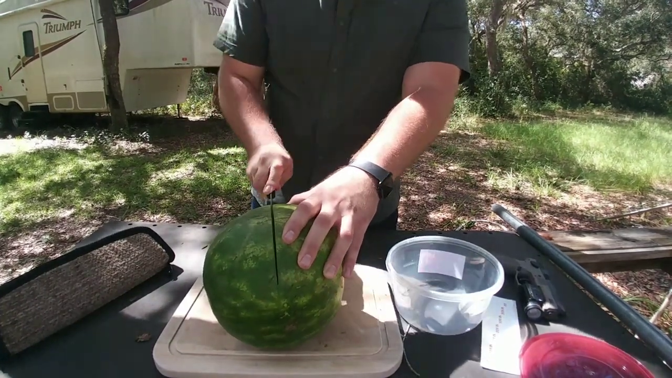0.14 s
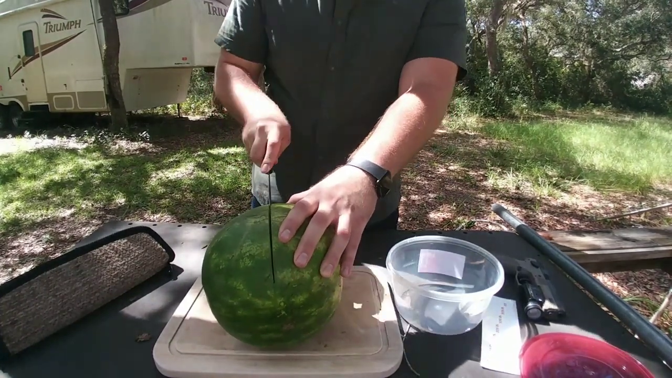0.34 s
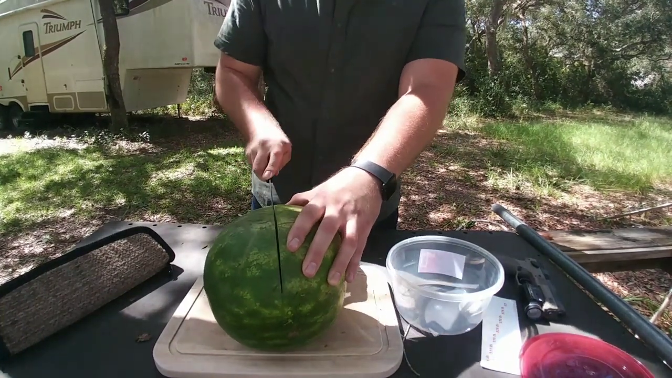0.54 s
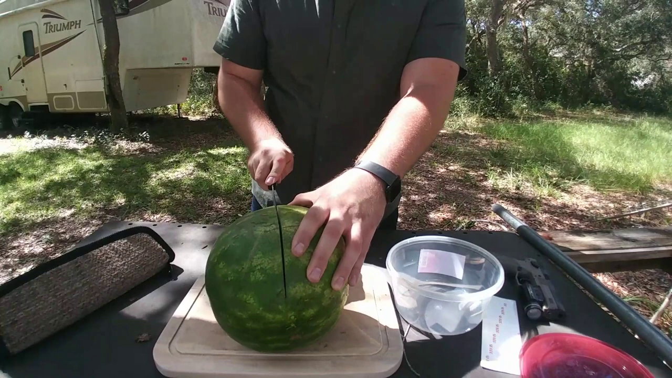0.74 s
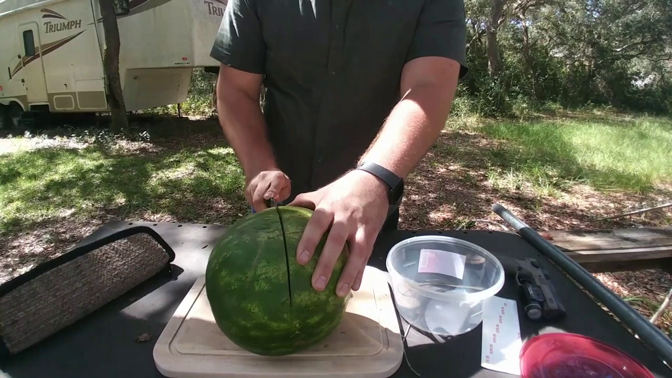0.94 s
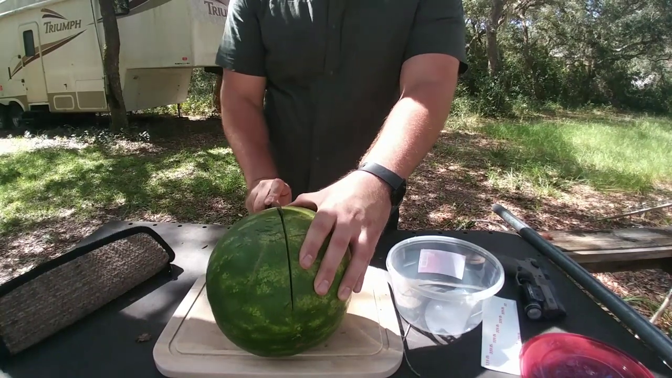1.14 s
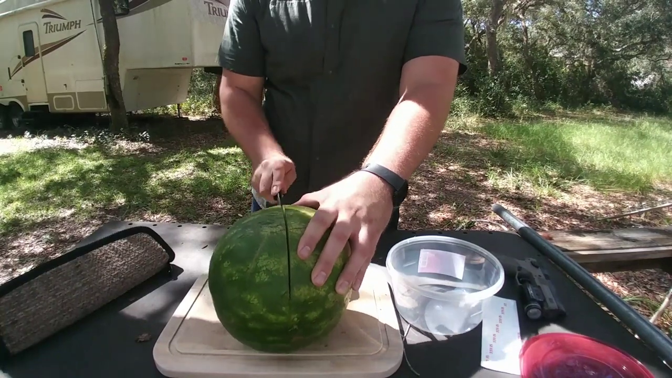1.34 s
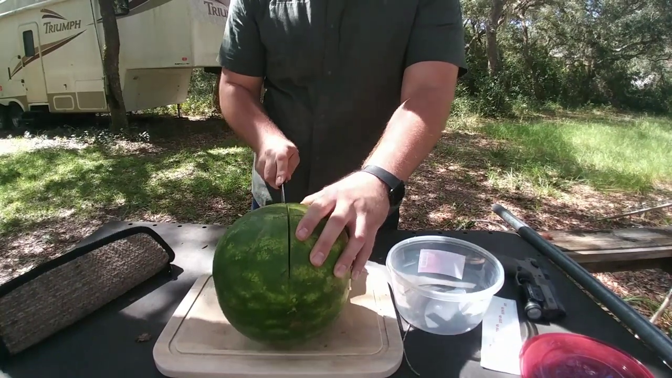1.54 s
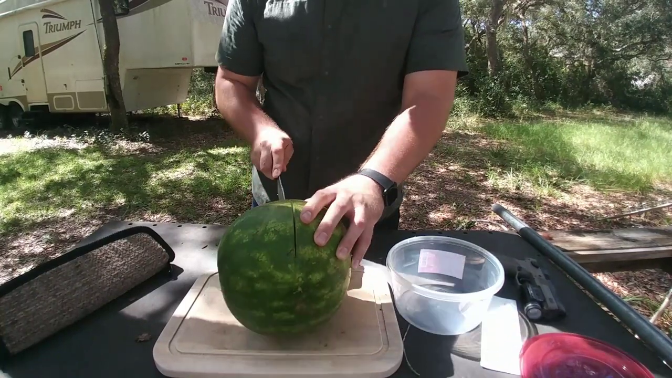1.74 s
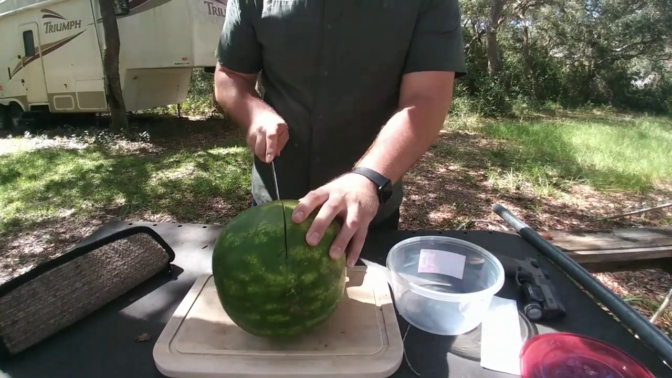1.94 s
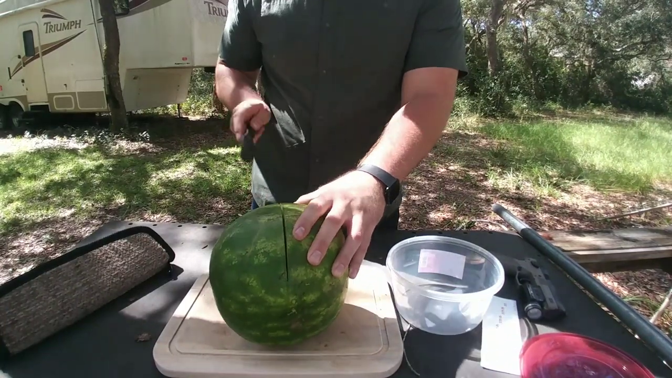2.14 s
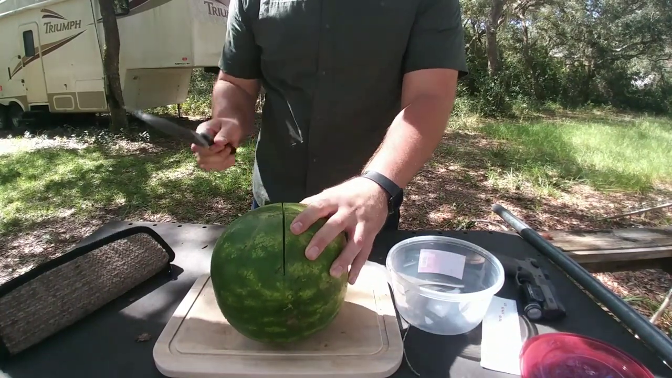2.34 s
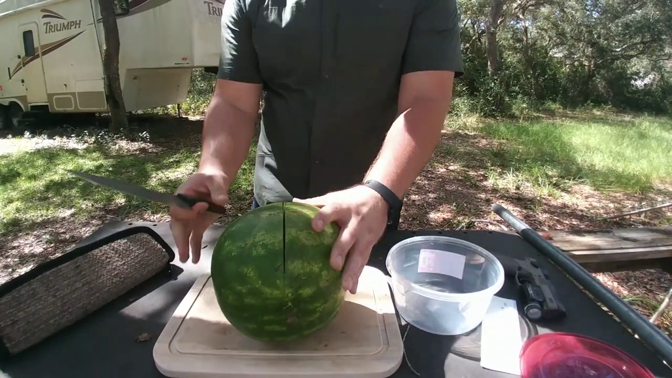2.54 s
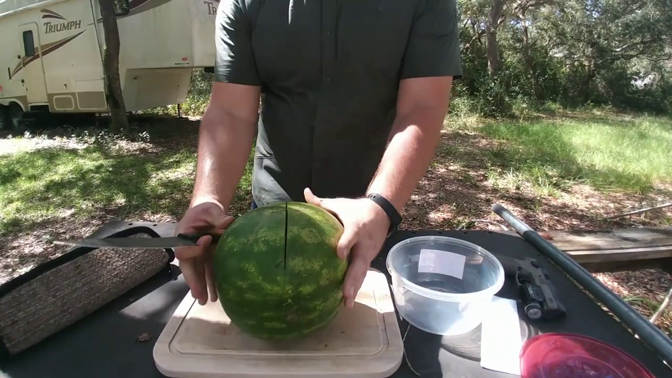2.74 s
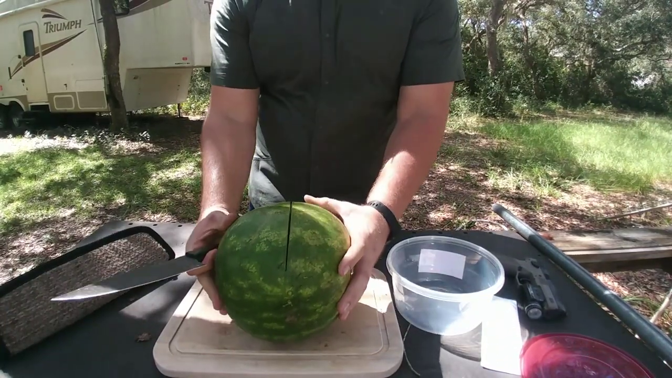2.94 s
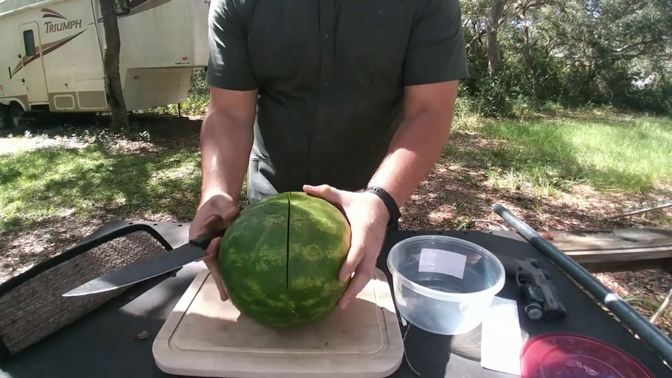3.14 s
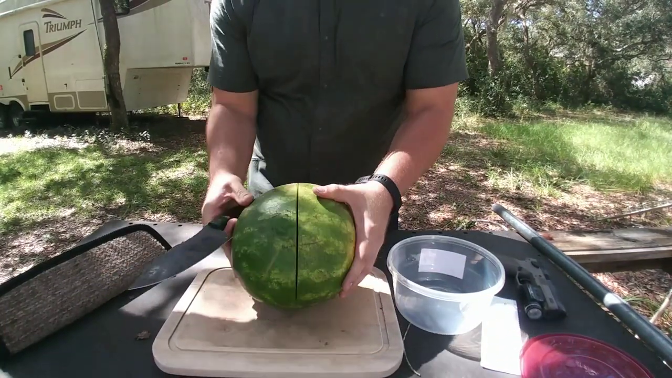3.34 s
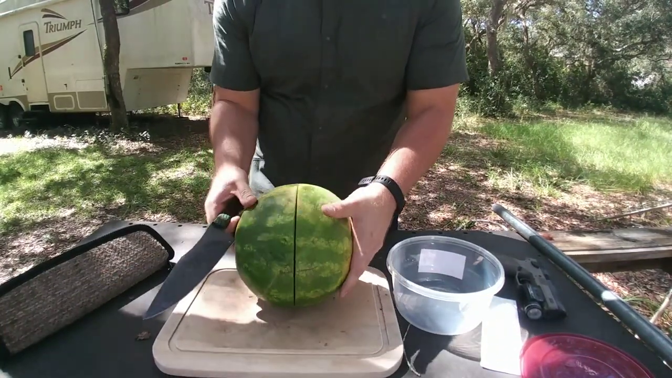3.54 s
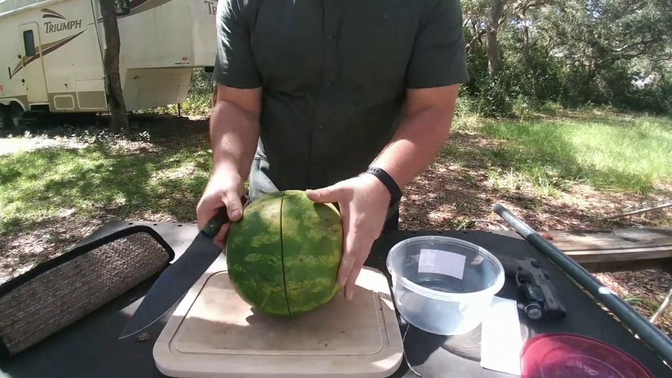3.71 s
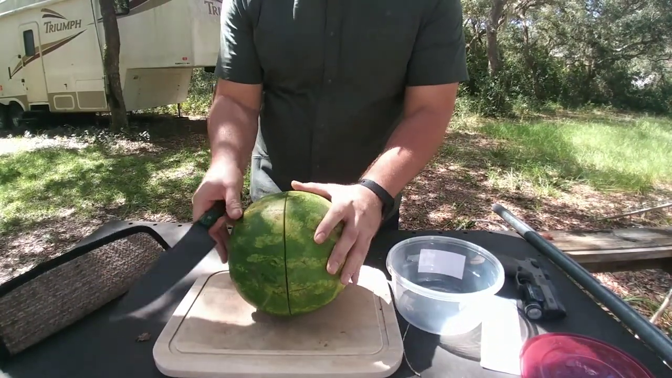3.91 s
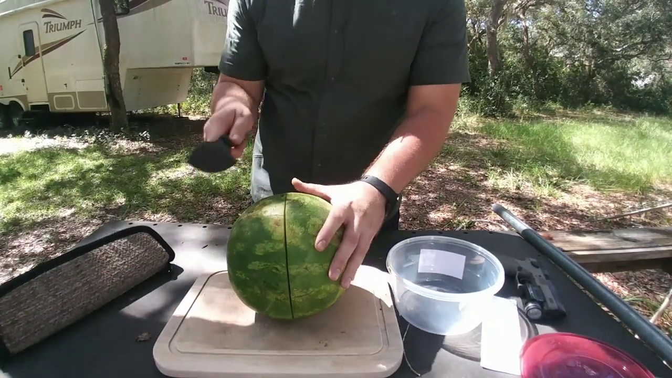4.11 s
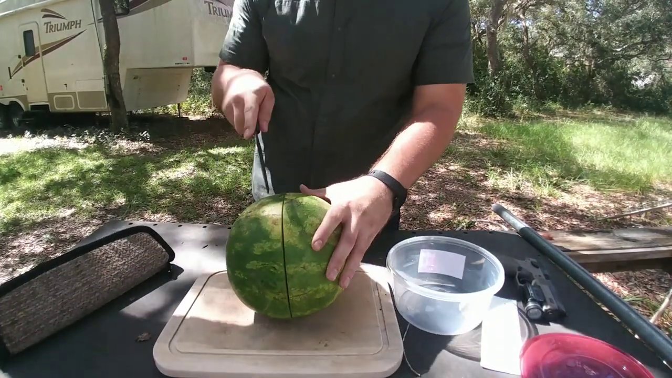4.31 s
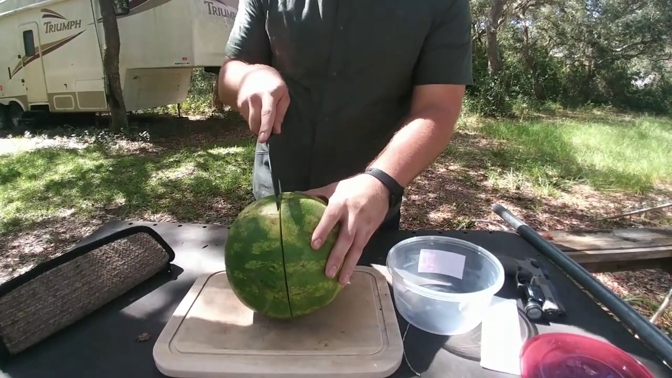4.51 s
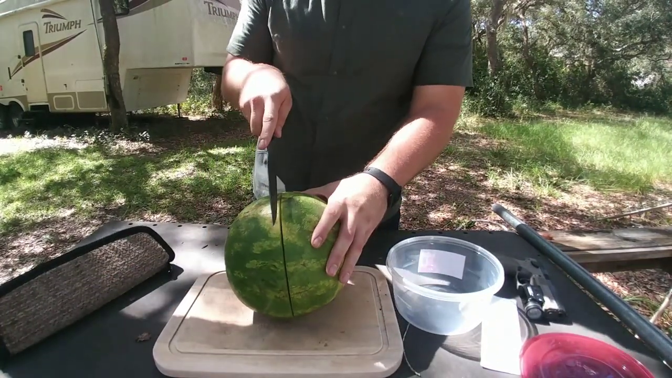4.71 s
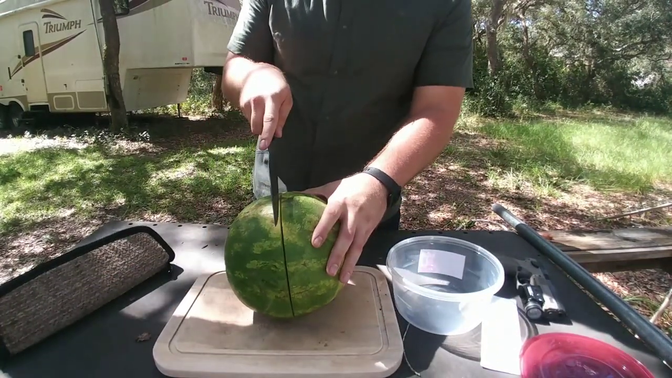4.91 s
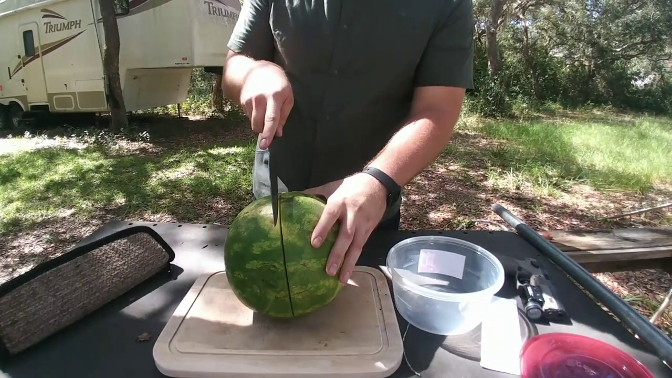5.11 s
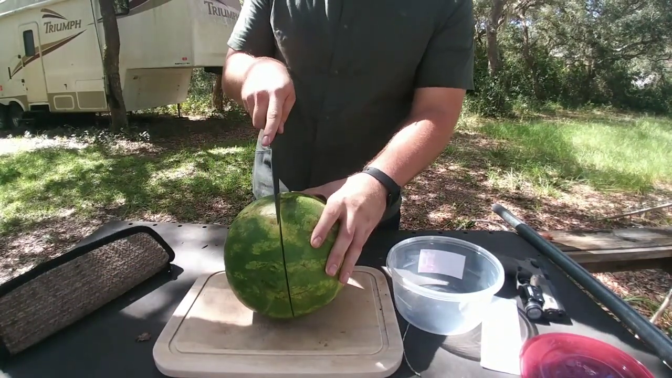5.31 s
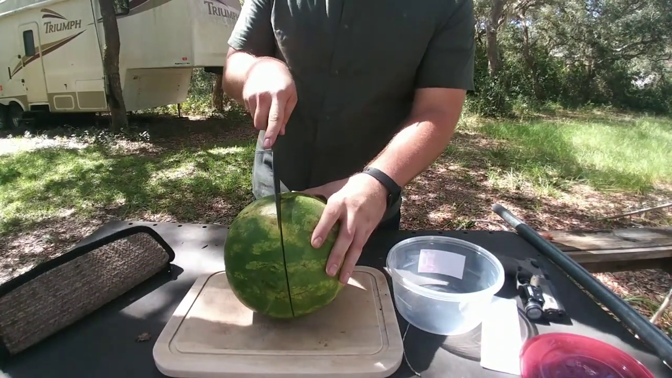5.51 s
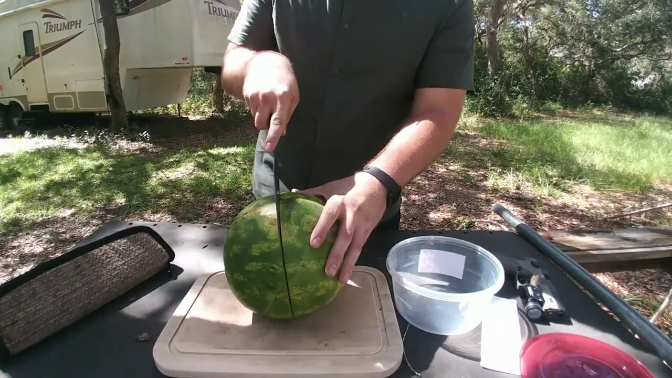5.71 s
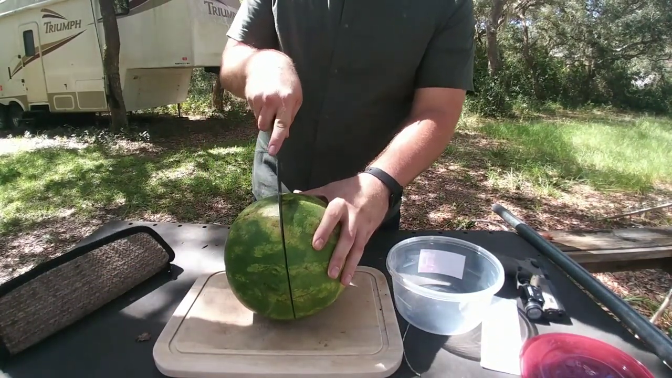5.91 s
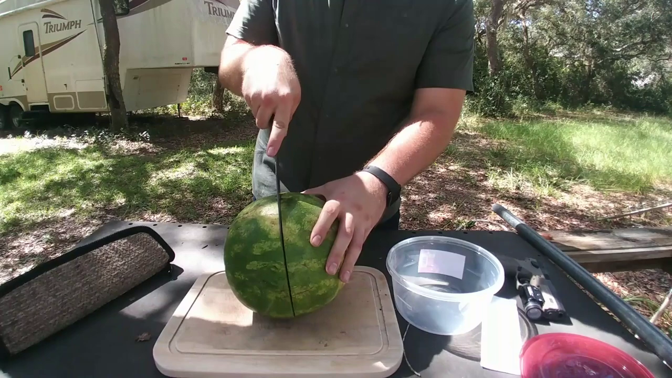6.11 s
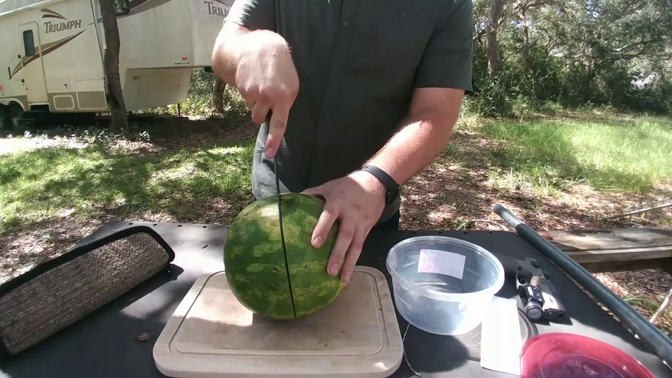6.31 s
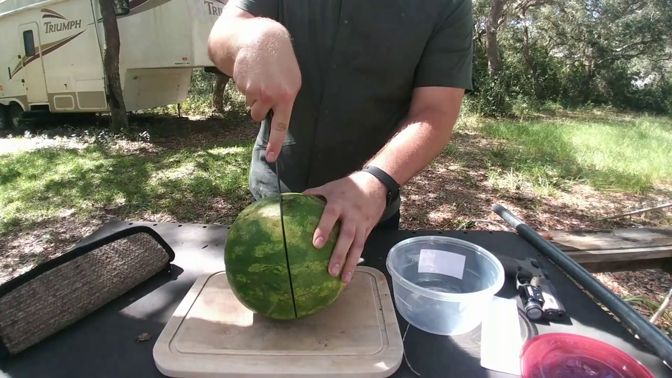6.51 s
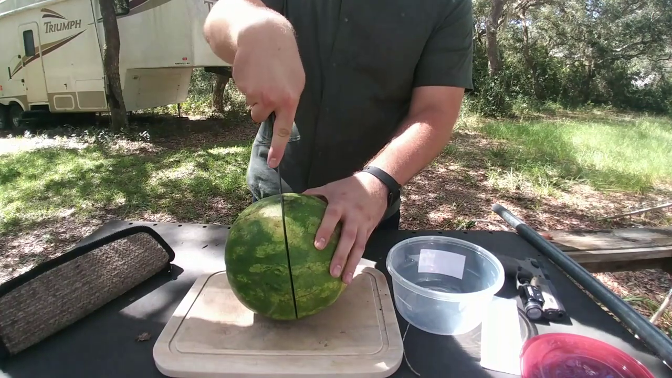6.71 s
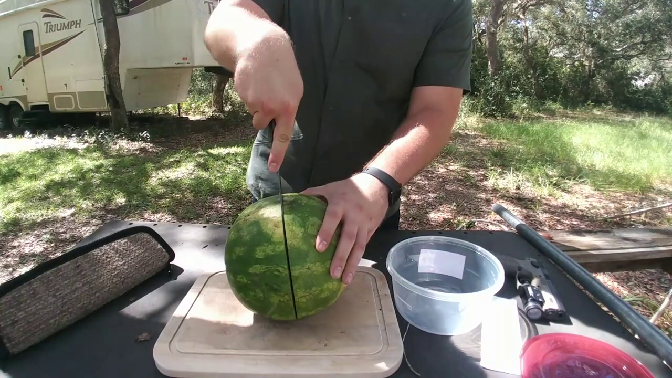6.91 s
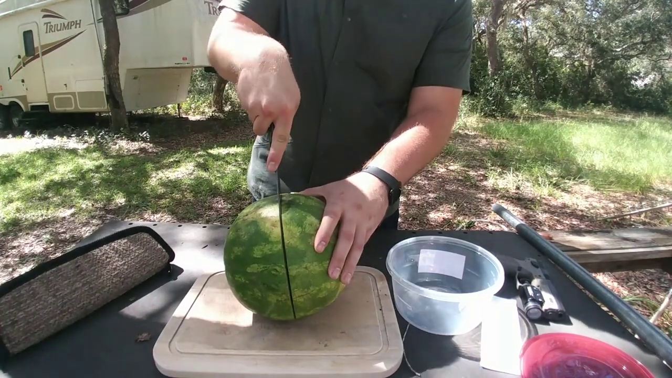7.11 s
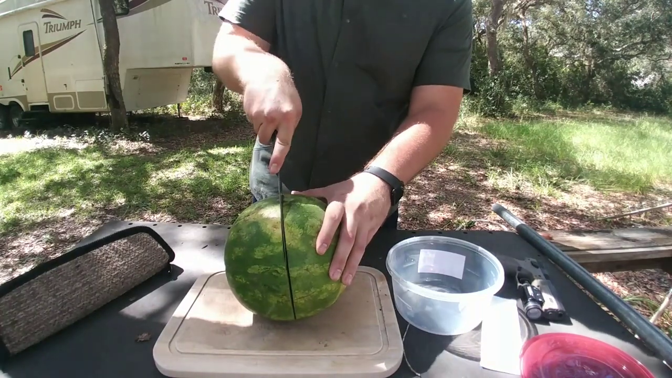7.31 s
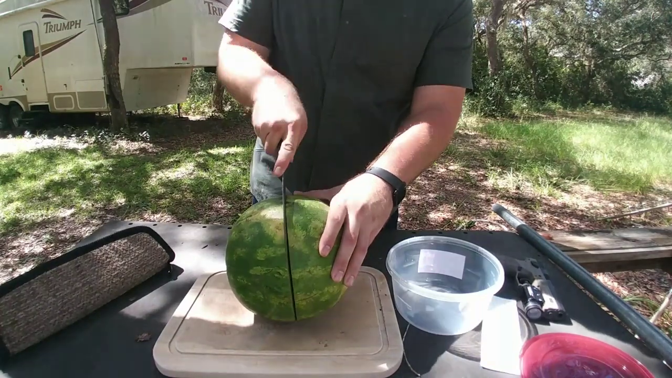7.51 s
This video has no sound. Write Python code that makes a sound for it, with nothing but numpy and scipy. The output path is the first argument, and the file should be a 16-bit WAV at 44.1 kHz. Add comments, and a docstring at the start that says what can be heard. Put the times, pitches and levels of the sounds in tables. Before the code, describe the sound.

Soft rasping, squelching knife strokes in a watermelon and a thud on a board, over faintly trilling crickets.

```python
"""A long knife saws through a watermelon: cells burst, rind rasps, wet steel hisses, air pockets squelch.
The blade rubs and rings faintly as it comes free. The melon is turned by hand, knocks and thuds onto
a cutting board, shaking the folding table below; a second cut begins.
Outdoors throughout: crickets trill by wing strokes over soft air, a low rumble, a far engine
and faint distant calls."""
import sys
import numpy as np
from scipy import signal
from scipy.fft import rfft, irfft
from scipy.io import wavfile
from scipy.ndimage import uniform_filter1d

SR = 44100
rng = np.random.default_rng(int(sys.argv[2]) if len(sys.argv) > 2 else 0)


def file_out(sig):
    """Save sig as 16-bit WAV at sys.argv[1]."""
    # one column per channel
    cols = np.atleast_2d(sig).T
    # limit, then scale
    lim = np.clip(cols, -1, 1)
    pcm = np.round(lim * 32767).astype(np.int16)
    wavfile.write(sys.argv[1], SR, pcm)


N = 332955
T = np.arange(N) / SR

# knife pushes: (start [s], end [s], melon body [dB], rind rasp [dB], wet hiss [dB])
KNIFE_STROKES = [(-.03, 0.115, -52.5, -53, -60.5), (0.116, 0.167, -51.5, -54.5, -65.5),
                 (0.293, 0.36, -67.5, -59.5, -80), (0.873, 1.02, -56.5, -65, -69.5),
                 (1.015, 1.239, -56, -60, -65.5), (1.32, 1.507, -72, -70, -72),
                 (1.642, 1.883, -76, -68.5, -70), (5.93, 5.995, -72, -67, -66),
                 (6.09, 6.118, -83, -67, -68), (6.216, 6.302, -67, -71, -69), (6.498, 6.617, -67, -72, -76),
                 (6.745, 6.821, -67.5, -68.5, -63.5), (6.976, 7.081, -60, -62.5, -57.5),
                 (7.137, 7.354, -59, -64, -65.5), (7.382, 7.514, -61.5, -67, -69),
                 (7.518, 7.56, -54.5, -63, -68)]
# wet steel and hands sliding on the rind: (start [s], end [s], level [dB])
RIND_SLIDES = [(0.142, 0.905, -65.5), (1.873, 2.122, -65), (2.065, 2.1, -69), (2.374, 2.627, -66.5),
               (2.634, 3.006, -65), (3.122, 3.276, -58.5), (3.274, 3.413, -64.5), (3.405, 3.474, -56.5),
               (3.652, 3.82, -51), (3.78, 3.991, -59.5), (4.025, 4.102, -70), (4.26, 4.317, -65),
               (4.335, 4.365, -63.5), (5.787, 5.904, -62.5)]
# melon resonances: (frequency [Hz], width [Hz], gain [dB])
MELON_MODES = [(160, 105, 4), (445, 147, -0.5), (710, 115, -11), (1250, 95, -11.5), (2070, 61, -24),
               (3700, 53, -20), (4760, 61, -18)]
# rind rasp: (frequency [Hz], gain [dB])
RASP_SPECTRUM = [(300, -8), (600, 8.5), (1300, 5.5), (2100, -2), (3200, -9), (4300, -10.5), (4780, -4),
                 (5200, -14), (6500, -12), (12000, -18.5)]
# wet hiss: (frequency [Hz], gain [dB])
HISS_SPECTRUM = [(1500, -4), (3000, -9.5), (5000, -7), (7000, -2.5), (10000, 3.5), (12000, -3.5),
                 (15500, -10.5)]
# one row per cricket: (pitch [Hz], wing strokes [1/s], trill length [s], level [dB])
CRICKET_SONGS = [(7335, 67, 0.637, -64.5), (8130, 70, 0.486, -64), (7100, 46, 0.43, -67.5)]
# trills, one row per cricket: (start [s], start [s], ...)
TRILL_STARTS_S = [
    [0, 1.128, 2.148, 3.288, 4.525, 5.67, 6.75],
    [.44, 1.469, 2.49, 3.68, 4.716, 5.819, 6.723],
    [0.611, 1.55, 2.481, 3.52, 4.381, 5.04, 5.91, 6.979],
]
# open air: (frequency [Hz], gain [dB])
AIR_SPECTRUM = [(15, -30), (25, -6), (82, 0.5), (136, -7.5), (281, -8), (322, -15.5), (445, -17),
                (1110, -23), (1240, -22.5), (3260, -27.5), (6050, -28), (7500, -18.5), (8810, -23.5),
                (14300, -29.5), (15500, -29)]
# far engine: (time [s], pitch [Hz], level [dB])
ENGINE_TRACK = [(0, 79, -79), (1.301, 100.1, -72), (2, 98, -68.5), (2.501, 80, -74.5), (4.2, 82, -69.5),
                (5.3, 80, -73), (6.1, 79, -66), (6.7, 79, -59.5), (7.1, 80, -58), (7.55, 80, -57.5)]
# whines and calls beyond the trees: (start [s], end [s], from [Hz], to [Hz], blur [Hz], level [dB])
CALL_GLIDES = [(0.093, 0.997, 1810, 1606, 120, -73), (1.801, 2.498, 1330, 1277, 125, -68),
               (1.748, 2.498, 3710, 3770, 210, -72), (1.95, 2.4, 2210, 2030, 23, -76),
               (2.498, 3.699, 1255, 1254, 83, -73), (3.422, 3.465, 1936, 1890, 18, -57.5),
               (3.903, 4.042, 2000, 1970, 13, -75.5), (4.249, 5.25, 1296, 1228, 69, -75),
               (4.398, 5.201, 3670, 3660, 130, -82), (6.451, 6.807, 2040, 2150, 61, -77.5)]
# air pockets in the wet slit: (start [s], end [s], from [Hz], to [Hz], level [dB])
AIR_POCKETS = [(.115, 0.16, 1053, 658, -49.5), (0.134, 0.165, 560, 303, -62),
               (0.163, 0.202, 190, 123.5, -43.5), (0.317, 0.352, 1212, 767, -59),
               (0.94, 0.967, 474, 437, -48.5), (1.19, 1.258, 164, 129, -47),
               (1.489, 1.551, 1090, 671, -61.5), (1.537, 1.566, 530, 400, -62.5),
               (1.682, 1.75, 535, 680, -61.5), (1.674, 1.762, 1500, 1745, -65.5),
               (1.736, 1.771, 712, 870, -52.5), (1.768, 1.857, 966, 1177, -67),
               (1.899, 1.934, 651, 776, -55), (6.104, 6.158, 720, 600, -67),
               (6.985, 7.011, 525, 462, -51.5), (7.055, 7.104, 408, 471, -53),
               (7.176, 7.323, 376.5, 336, -66)]
# rind snaps and finger ticks: (time [s], peak [dB], centre [Hz])
SNAPS = [(.187, -49, 5000), (.53, -48, 10000), (.947, -51, 1500), (1.037, -50, 1300), (1.236, -54, 1800),
         (1.522, -45, 9000), (1.691, -48, 10000), (3.028, -44, 9100), (3.122, -46, 10200),
         (3.155, -37, 9800), (3.168, -51, 4500), (3.223, -46, 1470), (3.228, -40.5, 10000),
         (4.081, -45, 10500), (4.666, -48, 7040), (4.664, -56, 2500), (5.365, -52, 10500),
         (6.922, -42, 9800), (6.923, -49.5, 2100), (7.083, -44, 2000), (7.084, -42, 7000)]
# dry rubs on the blade: (start [s], end [s], level [dB])
BLADE_SCRAPES = [(2.135, 2.169, -50), (2.161, 2.177, -50), (3.433, 3.46, -69.5), (3.494, 3.509, -45.5),
                 (3.51, 3.528, -54), (3.524, 3.544, -43.5), (3.537, 3.575, -52)]
# steel resonances: (frequency [Hz], width [Hz], gain [dB])
BLADE_MODES = [(3670, 72, -15), (3970, 46, -11), (4980, 36, -20), (6000, 40, -26), (6670, 58, 2),
               (7520, 130, -2), (8130, 44, 4), (8250, 46, -5), (9400, 240, 3), (9520, 51, 1),
               (10760, 91, 2), (11300, 67, -1.5), (12150, 76, -1), (14000, 60, -25)]
# melon striking the board: (time [s], level [dB], cut-off [Hz], table thump [dB])
BOARD_BLOWS = [(3.3083, -51, 5860, -40), (3.340, -68, 1790, -55), (3.390, -60, 2350, -46.5),
               (3.723, -44.2, 14000, -31.5), (3.741, -55, 4470, -38)]
# board chatter as the melon touches down, rocks and settles:
# (start [s], end [s], gap [s], level [dB], cut-off [Hz], table thump [dB], fade [dB/s])
BOARD_RATTLES = [(3.6775, 3.72, .0118, -63, 3280, -39, -24), (3.761, 3.8, .0138, -60, 2380, -38.5, 300),
                 (3.805, 3.95, .0405, -64, 2460, -40.5, 140)]
# board resonances: (frequency [Hz], width [Hz], gain [dB])
BOARD_MODES = [(470, 39, 4), (768, 40, 4.5), (830, 110, -8), (1850, 17, -5), (1955, 220, -1.5),
               (1965, 36, -3), (2293, 110, -4.5), (2970, 65, -14), (3300, 170, -15), (3670, 59, -5.5),
               (4220, 84, -4.5), (4480, 140, -9.5), (4900, 110, -6.5), (5400, 70, -7.5), (5820, 23, -25),
               (5860, 99, -6), (7250, 28, -18), (6950, 100, -12.5)]
# low table-top modes: (frequency [Hz], t60 [s], gain [dB])
TABLE_MODES = [(48.4, 0.23, -15), (77.4, 0.23, 1), (105, 0.26, -5.5), (136.6, 0.21, -8), (224, 0.14, -12),
               (299, 0.089, -16), (451, 0.1, -10)]
# board and table clatter: (frequency [Hz], gain [dB])
CLATTER_SPECTRUM = [(120, -3.5), (300, 0), (520, -2), (780, -5.5), (1100, -0.5), (1700, -5), (2600, 1),
                    (3200, -3.5), (4000, -8), (6000, -13.5), (8000, -4.5), (10500, -5), (15500, -20)]


def undb(db):
    """Decibels to gain."""
    return 10 ** (np.asarray(db) / 20)


def rms(x):
    """Rms of a real or complex signal."""
    return np.sqrt(np.mean(np.abs(x) ** 2) + 1e-20)


def unit(x):
    """Scale to rms 1."""
    return x / rms(x)


def add(out, start_s, x):
    """Mix x into out; negative starts move to 0."""
    i = max(int(start_s * SR), 0)
    out[i:i + len(x)] += x[:max(len(out) - i, 0)]


def colour(x, spectrum):
    """Minimum-phase filter from (frequency [Hz], gain [dB]) points."""
    hz, db = np.transpose(spectrum)
    grid_hz = np.fft.rfftfreq(4096, 1 / SR)
    gain = undb(np.interp(np.log(grid_hz + 1), np.log(hz), db))
    cepstrum = irfft(np.log(gain))
    half = len(cepstrum) // 2
    folded = np.r_[cepstrum[0], 2 * cepstrum[1:half], np.zeros(half)]
    return signal.fftconvolve(x, irfft(np.exp(rfft(folded))))[:len(x)]


def band(x, hz, width_hz):
    """One resonance, gain 1 at centre."""
    q = hz / min(width_hz, .3 * SR)
    return signal.lfilter(*signal.iirpeak(min(hz, .45 * SR), q, fs=SR), x + 1e-18)


def noise_band(count, hz, width_hz):
    """White noise through the same resonance twice."""
    return band(band(rng.standard_normal(count), hz, width_hz), hz, width_hz)


def ring(x, modes):
    """Parallel resonances."""
    return sum(undb(db) * band(x, hz, width_hz) for hz, width_hz, db in modes)


def lowpass(x, hz, order=2):
    """Smooth roll-off."""
    return signal.sosfilt(signal.butter(order, min(hz, .45 * SR), fs=SR, output="sos"), x + 1e-18)


def walk(rate_hz):
    """Smooth random drift, rms 1."""
    step = int(SR / rate_hz)
    held = np.repeat(rng.standard_normal(N // step + 1), step)
    return unit(uniform_filter1d(held, step)[:N])


def grains(per_s, spread_db):
    """Random impulses: many small, few large."""
    size = undb(spread_db * np.minimum(rng.standard_exponential(N), 4))
    return (rng.random(N) < per_s / SR) * size * rng.choice([-1, 1], N)


def swell(count):
    """Half-sine rise and fall."""
    return np.sin(np.pi * (np.arange(count) + .5) / count)


def swells(rows, exponent=1):
    """Envelope with one swell per row; exponents below 1 flatten the tops."""
    envelope = np.zeros(N)
    for start_s, end_s, db in rows:
        add(envelope, start_s, undb(db) * swell(int((end_s - start_s) * SR)) ** exponent)
    return envelope


def glide(start_s, end_s, from_hz, to_hz, blur_hz, rough):
    """Swelling, gliding note; rough 0 is a pure tone, 1 a noise band."""
    count = int((end_s - start_s) * SR)
    noise = rng.standard_normal(2 * count) + 1j * rng.standard_normal(2 * count)
    blur = unit(lowpass(noise, blur_hz)[count:])
    tone = np.exp(2j * np.pi * np.cumsum(np.geomspace(from_hz, to_hz, count)) / SR)
    note = np.imag(tone * (1 - rough + rough * blur))
    return swell(count) * unit(note) / np.sqrt(2)


def cutting(bite_s=0.018, release_s=0.018, catch_db=0.45, slide_rasp_db=-15):
    """Cells burst along the edge and ring the melon; rind rasps, wet steel hisses."""
    cells = grains(per_s=2200, spread_db=2.0)
    body = unit(lowpass(ring(cells, MELON_MODES), hz=880))
    rasp = unit(colour(cells, RASP_SPECTRUM)) * undb(1.15 * walk(rate_hz=77))
    wet_grains = grains(per_s=7000, spread_db=4.5)
    hiss = unit(colour(wet_grains, HISS_SPECTRUM)) * undb(1.86 * walk(rate_hz=45))
    cuts = np.zeros(N)
    for start_s, end_s, body_db, rasp_db, hiss_db in KNIFE_STROKES:
        bite = np.clip((T - start_s) / bite_s, 0, 1)
        release = np.exp(-np.clip((T - end_s) / release_s, 0, 20))
        cuts += bite * release * (undb(body_db) * body + undb(rasp_db) * rasp + undb(hiss_db) * hiss)
    catch_and_slip = undb(catch_db * walk(rate_hz=30))
    slides = swells(RIND_SLIDES, exponent=0.35) * (hiss + undb(slide_rasp_db) * rasp)
    return cuts * catch_and_slip + slides


def crickets(duty=.62, pitch_fall=.17, rise_s=0.095, release_s=0.038, scatter_db=-2.5, chorus_db=-83):
    """Each wing stroke is a falling note, scattered by grass and trees; far crickets blur to a chorus."""
    direct = np.zeros(N)
    wobble = 1 + 0.0181 * walk(rate_hz=900)
    for (hz, strokes_per_s, length_s, db), starts_s in zip(CRICKET_SONGS, TRILL_STARTS_S):
        wing_cycles = np.cumsum(strokes_per_s * (1 + .07 * walk(rate_hz=9))) / SR
        for start_s in starts_s:
            active = (T >= start_s) & (T < start_s + length_s)
            t = T[active] - start_s
            stroke = wing_cycles[active] % 1 / duty
            pitch_hz = hz * (1 - pitch_fall * (stroke - .5)) * wobble[active]
            tone = np.sin(2 * np.pi * np.cumsum(pitch_hz) / SR)
            pulses = np.sin(np.pi * np.minimum(stroke, 1))
            effort = np.clip(t / rise_s, 0, 1) ** .5 * np.clip((length_s - t) / release_s, 0, 1)
            direct[active] += undb(db) * effort * unit(pulses * tone)
    direct *= undb(1.15 * walk(rate_hz=60))
    t = T[:SR // 10]
    leaves = rng.standard_normal(len(t)) * np.exp(-t / 0.019)
    scattered = signal.fftconvolve(direct, leaves / np.linalg.norm(leaves))[:N]
    chorus = unit(noise_band(N, hz=7430, width_hz=900)) * undb(1.1 * walk(rate_hz=2))
    return direct + undb(scatter_db) * scattered + undb(chorus_db) * chorus


def open_air(air_db=-62, rumble_db=-70.5):
    """Soft, drifting broadband noise over a low rumble."""
    air = unit(colour(rng.standard_normal(N), AIR_SPECTRUM))
    air *= undb(air_db + 0.42 * walk(rate_hz=3.16))
    rumble = unit(noise_band(N, hz=52.8, width_hz=22))
    return air + undb(rumble_db) * rumble


def far_engine(flutter_db=2):
    """Drone of three harmonics, wavering in pitch and level."""
    time_s, hz, db = np.transpose(ENGINE_TRACK)
    pitch_hz = np.interp(T, time_s, hz) * (1 + 0.0149 * walk(rate_hz=13))
    phase = 2 * np.pi * np.cumsum(pitch_hz) / SR
    drone = unit(np.sin(phase) + undb(-18) * np.sin(2 * phase) + undb(-13) * np.sin(3 * phase))
    return drone * undb(np.interp(T, time_s, db) + flutter_db * walk(rate_hz=19))


def far_calls():
    """Distant tones, blurred on their way through the trees."""
    out = np.zeros(N)
    for start_s, end_s, from_hz, to_hz, blur_hz, db in CALL_GLIDES:
        add(out, start_s, undb(db) * glide(start_s, end_s, from_hz, to_hz, blur_hz, rough=1))
    return out


def squelches(rub_db=-7):
    """Air pockets glide in pitch as they open or close, with wet rubbing around each note."""
    out = np.zeros(N)
    for start_s, end_s, from_hz, to_hz, db in AIR_POCKETS:
        note = glide(start_s, end_s, from_hz, to_hz, blur_hz=0.087 * from_hz, rough=.4)
        rub = glide(start_s, end_s, 1.3 * from_hz, 1.8 * to_hz, blur_hz=1.38 * from_hz, rough=0.82)
        add(out, start_s, undb(db) * (note + undb(rub_db) * rub))
    return out


def snaps(decay_s=0.0021):
    """Rind snaps and fingers tick: short noise bursts, each in its own band."""
    out, t = np.zeros(N), T[:SR // 20]
    for time_s, db, hz in SNAPS:
        burst = rng.standard_normal(len(t)) * np.exp(-t / decay_s)
        snap = band(burst, hz, width_hz=.65 * hz)
        add(out, time_s, undb(db) * snap / np.abs(snap).max())
    return out


def blade_ring(rub_db=-7.5, melon_db=-15):
    """Dry slips ring the steel's high modes and faintly shake the melon."""
    pressure = swells(BLADE_SCRAPES)
    slips = unit(grains(per_s=9000, spread_db=0.5))
    steel = ring(slips * pressure, BLADE_MODES) / np.std(ring(slips, BLADE_MODES))
    melon = unit(lowpass(ring(slips, MELON_MODES), hz=890))
    rub = unit(colour(slips, HISS_SPECTRUM))
    return steel + pressure * (undb(melon_db) * melon + undb(rub_db) * rub)


def contacts(rebound_s=.007, thump_fade_ratio=1.8):
    """Blows, each with a softer, duller rebound, and chatter; light bounces barely shake the table."""
    for time_s, db, cutoff_hz, thump_db in BOARD_BLOWS:
        yield time_s, db, cutoff_hz, thump_db
        yield time_s + rebound_s, db - 6, 0.13 * cutoff_hz, thump_db - 17
    for start_s, end_s, gap_s, db, cutoff_hz, thump_db, fade_db_per_s in BOARD_RATTLES:
        for t in np.arange(0, end_s - start_s, gap_s):
            fade_db = fade_db_per_s * t
            yield start_s + t, db - fade_db, cutoff_hz, thump_db - thump_fade_ratio * fade_db


def knocks(board_db=-1, crack_db=-3, clatter_db=-2, melon_damping_t60_s=0.27):
    """Each contact cracks, rings the board under the melon's damping weight and shakes the table."""
    out, t = np.zeros(N), T[:SR // 2]
    impulse = signal.unit_impulse(len(t))
    free_board = sum((-1) ** k * ring(impulse, [mode]) for k, mode in enumerate(BOARD_MODES))
    board = unit(free_board * undb(-60 * t / melon_damping_t60_s))
    crack = -unit(colour(impulse, CLATTER_SPECTRUM))
    thump = sum(undb(db - 60 * t / t60_s) * np.sin(2 * np.pi * hz * t) for hz, t60_s, db in TABLE_MODES)
    for time_s, db, cutoff_hz, thump_db in contacts():
        dense_modes = np.zeros(len(t))
        for hz in 180 * 2. ** np.arange(7):
            t60_s = 0.089 * (1000 / hz) ** 0.81  # high octaves die first
            dense_modes += noise_band(len(t), hz, width_hz=hz) * undb(-60 * t / t60_s)
        clatter = unit(colour(dense_modes, CLATTER_SPECTRUM))
        blow = undb(board_db) * board + undb(crack_db) * crack + undb(clatter_db) * clatter
        add(out, time_s, undb(db) * lowpass(blow, cutoff_hz, order=4) + undb(thump_db) * thump)
    return out


def yard_echo(near, delay_s=.012, t60_s=0.15):
    """Reflections from the ground, a trailer and the trees."""
    t = T[:SR // 2]
    response = lowpass(rng.standard_normal(len(t)), hz=5200) * undb(-60 * t / t60_s) * (t > delay_s)
    return signal.fftconvolve(near, response / np.linalg.norm(response))[:N]


def scene(echo_db=-27):
    """Mono mix: near sounds, their faint echo, outdoor background."""
    near = cutting() + squelches() + knocks() + blade_ring() + snaps()
    echo = undb(echo_db) * yard_echo(near)
    return (near + echo + crickets() + far_calls() + open_air() + far_engine())[None]


def record(dry, low_hz=39, top_hz=15550):
    """Cut the deepest bass and the top treble."""
    dry = signal.sosfilt(signal.butter(5, low_hz, "high", fs=SR, output="sos"), dry)
    return signal.sosfilt(signal.ellip(10, .2, 70, top_hz, fs=SR, output="sos"), dry)


dry = scene()
out = record(dry)
file_out(out)
```